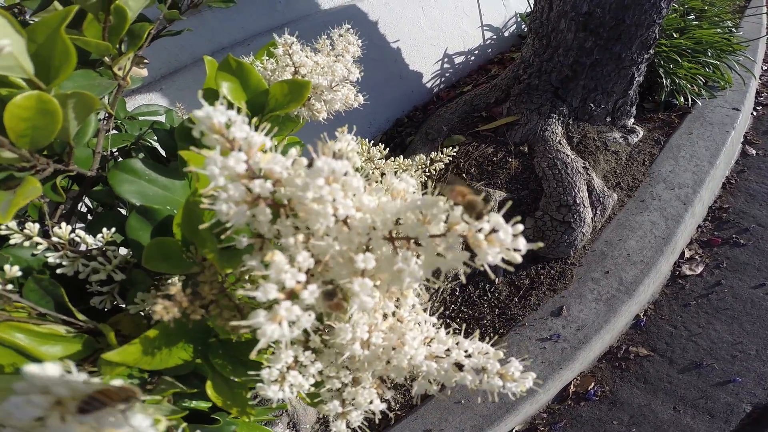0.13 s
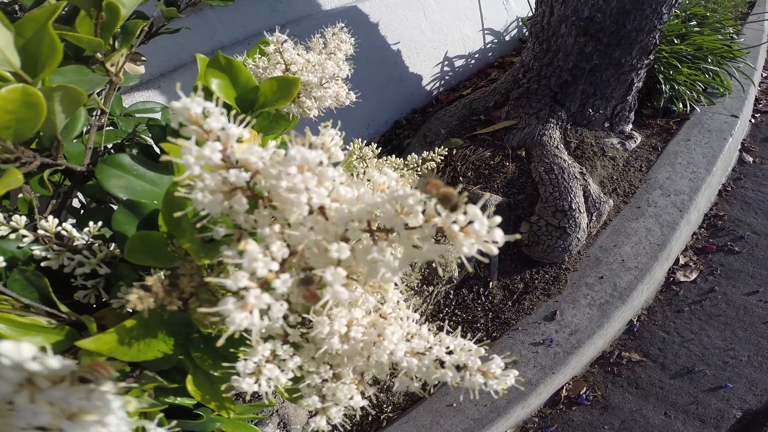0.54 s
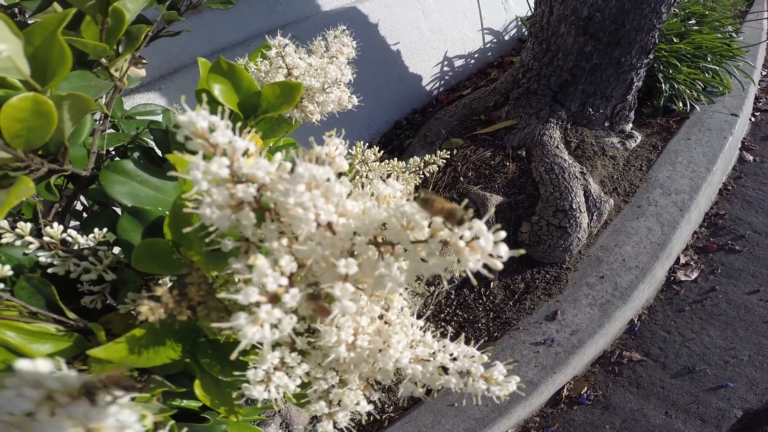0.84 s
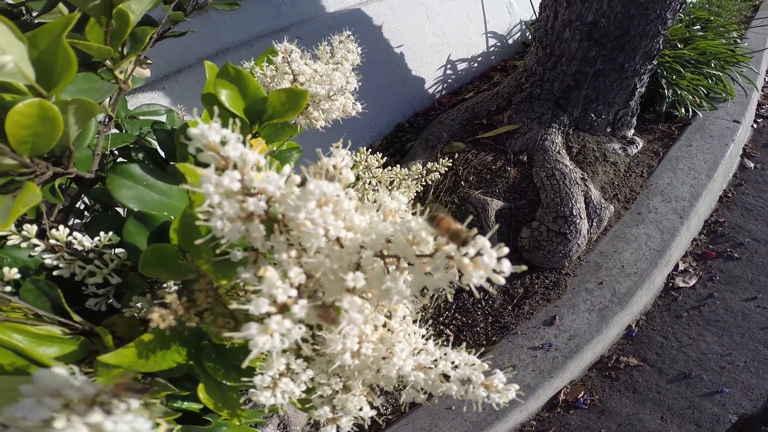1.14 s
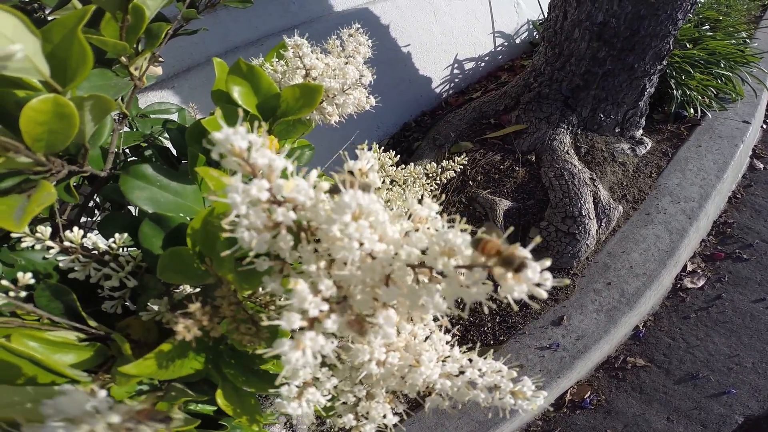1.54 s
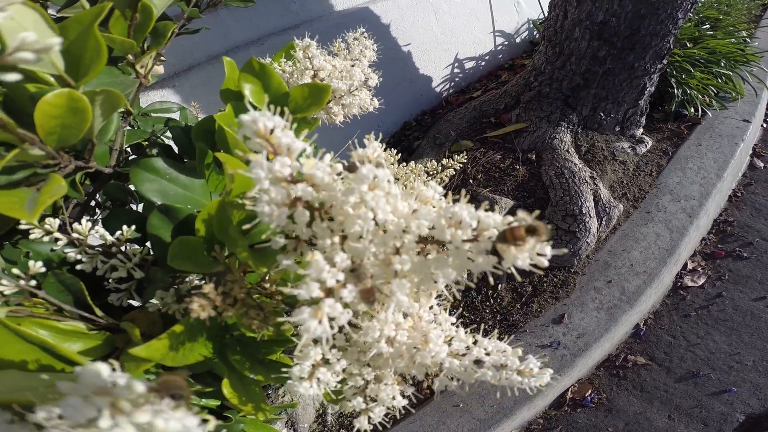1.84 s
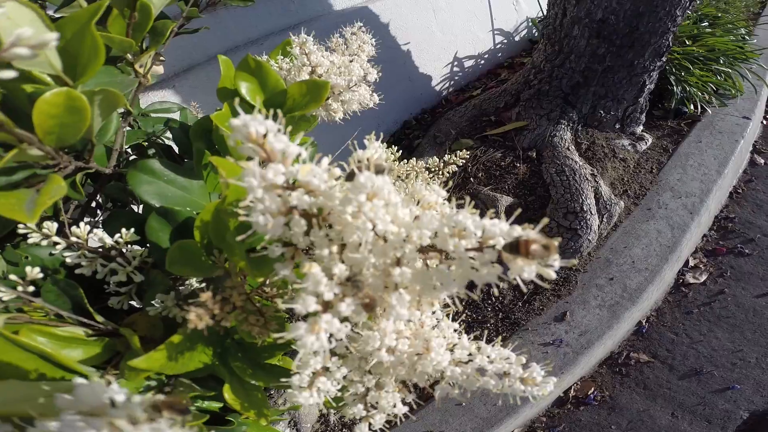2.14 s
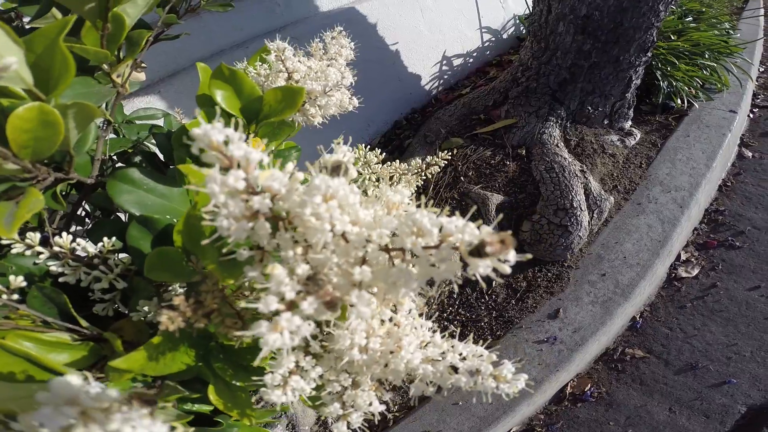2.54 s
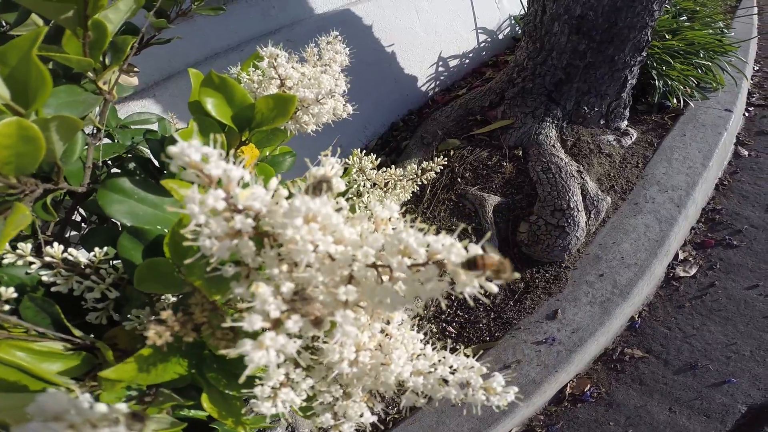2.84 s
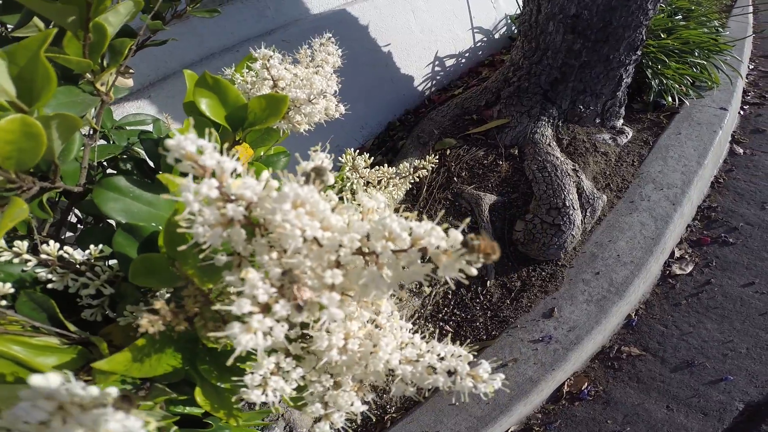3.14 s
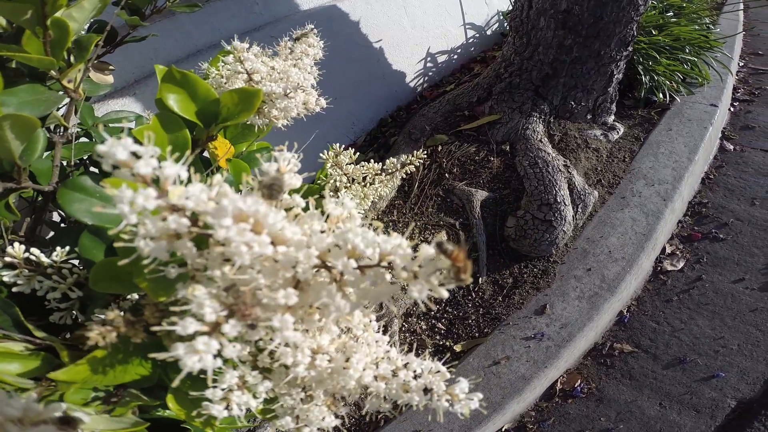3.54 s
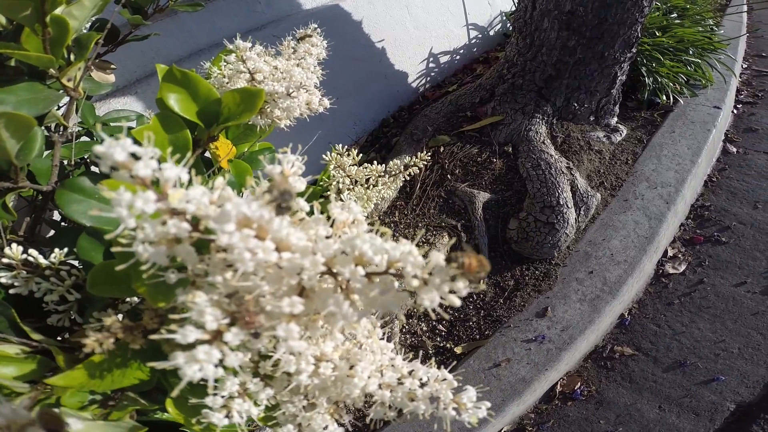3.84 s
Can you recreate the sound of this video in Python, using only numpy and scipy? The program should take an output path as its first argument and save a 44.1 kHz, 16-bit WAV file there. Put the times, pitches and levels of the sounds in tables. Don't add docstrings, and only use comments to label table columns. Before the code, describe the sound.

Outdoors, low wind buffeting strikes the microphone in irregular bursts and fades late, uncovering soft distant town noise, thin sliding bird notes, light leaf crackles and a very brief second bee hum.

```python
import sys
import numpy as np
from scipy import signal
from scipy.io import wavfile
from scipy.ndimage import uniform_filter1d

SR = 44100
rng = np.random.default_rng(int(sys.argv[2]) if len(sys.argv) > 2 else 0)


def store_pcm(level_fs):
    pcm = np.round(np.clip(level_fs, -1, 1) * 32767).astype(np.int16)
    wavfile.write(sys.argv[1], SR, np.atleast_2d(pcm).T)


def voltage_ratio(decibels):
    exponent = np.asarray(decibels, float) / 20
    return 10 ** exponent


N = 176400


def lowpass_or_band(x, edge_hz, kind):
    return signal.sosfilt(signal.butter(2, edge_hz, kind, fs=SR, output="sos"), x)


def drift(rate_hz):
    pole = np.exp(-80 * np.pi * rate_hz / SR)
    slow = signal.lfilter([1], [1, -2 * pole, pole * pole], rng.standard_normal(N // 40 + 2002))[2000:]
    return np.interp(np.arange(N) / 40, np.arange(len(slow)), slow / slow.std())


# [t/s, level/dB, eddy width/ms]
GUSTS = [(0, -29, 3), (.1, -23.5, 2.8), (0.226, -23, 1.3), (0.259, -33.5, 2.1), (.48, -25, 3.2),
         (.72, -33, 4), (1.0, -37.5, 3.8), (1.119, -30.5, 2.8), (1.42, -24.5, 1.1), (1.66, -25, 2.55),
         (2.12, -29, 2.2), (2.56, -32, 2.9), (2.9, -39.5, 5.14), (3.33, -28.5, 2.4), (3.45, -60, 1.6),
         (3.6, -36.5, 6.8), (3.7, -55.5, 4.3), (4.0, -48.5, 2.7)]
# [t/s, width/s, depth/dB]
LULLS = [
    (0.427, 0.02, 15),
    (0.562, 0.047, 10),
    (1.02, 0.034, 8.5),
    (1.722, 0.022, 21),
    (2.304, 0.0065, 26),
    (2.36, 0.019, 13),
    (2.86, 0.034, 14),
    (3.14, 0.012, 1.5),
]


def gust_db(t):
    s, db, _ = np.transpose(GUSTS)
    dips = sum(depth_db * np.exp(-((t - at) / width) ** 2 / 2) for at, width, depth_db in LULLS)
    return np.interp(t, s, db) - dips


def add_eddy(out, s, db, width_ms, sign):
    suction, lag, wider = .62, 1.3 * 2.355, 1.5
    w = width_ms * SR / 2355
    i = np.arange(max(int(s * SR - 5 * w), 0), min(int(s * SR + 16 * w), len(out)))
    u = (i - s * SR) / w
    push = np.exp(-u ** 2 / 2)
    pull = suction * np.exp(-((u - lag) / wider) ** 2 / 2)
    out[i] += sign * voltage_ratio(db) * (push - pull)


# [t/s, peak level/dB,
# width/ms]
EDDIES = [(0.009, -12.5, 1.58), (0.042, -16, 1.55), (0.142, -14.5, 4.4), (0.176, -13, 3.2),
          (0.224, -5, 1.89), (0.321, -16.5, 2.07), (0.474, -20.5, 1.9), (0.763, -24, 3.6),
          (1.229, -12, 2.27), (1.267, -13, 3.15), (1.317, -17, 1.4), (1.37, -11, 1.28), (1.413, -9, 1.94),
          (1.452, -15, 1.75), (1.49, -14.5, 1.15), (1.526, -17.5, 1.37), (1.56, -10, 1.82),
          (1.599, -17.5, 1.27), (1.631, -20, 1.23), (1.836, -15.5, 3), (1.917, -11, 1.61),
          (2.213, -17.5, 3), (2.247, -22.5, 1.46), (2.328, -13.5, 1.9), (2.436, -17, 2.6), (2.675, -18, 3),
          (3.195, -26, 1.9), (3.329, -21.5, 3.1), (3.988, -25.5, 5),
          (0.058, -16.5, 2.1), (0.128, -24.5, 1.6), (0.16, -13.5, 1.7), (0.193, -15, 1.2),
         (0.336, -20, 2.96), (0.461, -19, 2.74), (0.741, -24, 1.8), (0.828, -25, 3.8), (1.213, -19, 1.9),
         (1.3248, -24, 0.79), (1.342, -20, 1.5), (1.386, -19, 1.52), (1.43, -15.5, 1.54),
         (1.471, -16.5, 1.13), (1.579, -20, 2.4), (1.614, -18, 1.54), (1.675, -26, 2.8), (1.819, -21, 1.9),
         (1.899, -25, 2), (1.941, -25, 1.1), (1.966, -21.5, 1.8), (1.998, -27, 1.3), (2.032, -28, 2.1),
         (2.154, -20, 2.3), (2.447, -24, 9.5), (2.489, -25, 2.3), (2.527, -23, 2.5), (2.992, -29, 2.7),
         (3.113, -24, 4.2), (3.276, -27, 2.7), (3.341, -23, 1.94),
          (0.05, -18, 2.45), (0.148, -18.7, 1.3), (0.2, -15.9, 13.5), (0.234, -20.5, 1.2),
           (0.479, -25, 1.67), (0.487, -25, 1.77), (0.492, -25, 5.1), (0.662, -25, 2.8),
           (0.679, -28.5, 2.7), (0.694, -26, 4.9), (0.703, -26, 2.04), (0.717, -26, 6.2), (0.728, -26, 3.7),
           (0.803, -27, 2.3), (1.115, -25, 8), (1.128, -17.5, 3.8), (1.138, -23.5, 3), (1.258, -22, 6.1),
           (1.308, -22.3, 1.45), (1.324, -20, 1.8), (1.354, -18, 1.9), (1.361, -12, 1.36),
           (1.377, -19, 1.5), (1.391, -18.5, 1.2), (1.406, -19.5, 1.1), (1.436, -24, 2.4),
           (1.441, -13, 1.34), (1.51, -21.6, 2.5), (1.566, -20, 4.6), (1.594, -20, 1.34), (1.623, -19, 1.4),
           (1.641, -21, 4.1), (1.799, -31, 3.7), (1.809, -23.5, 1.8), (1.855, -27.5, 5.7),
           (1.891, -22.5, 1.9), (1.926, -18.5, 1.66), (2.007, -22, 2), (2.018, -20, 1.8), (2.051, -22, 2.6),
           (2.054, -21, 1.31), (2.069, -26, 2.2), (2.087, -28, 2.4), (2.104, -22.5, 1.9), (2.167, -33, 7.8),
           (2.194, -19, 2.1), (2.259, -20.5, 1.8), (2.376, -24.5, 2.6), (2.536, -20, 3.4),
           (2.559, -23.5, 3.0), (2.563, -28, 3), (2.583, -21, 2.4), (2.756, -22, 2.6), (2.979, -28.3, 5.7),
           (3.171, -23.5, 8), (3.24, -28, 4.8), (3.248, -24, 2.5), (3.291, -31, 4.4), (3.336, -32, 2.5),
           (3.347, -30, 2.9)]
# [t/s, peak level/dB, width/ms]
TWIN = (.2275, -14, 1.5)
# [t/s, peak level/dB, width/ms]
PULLS = [(0.071, -16.5, 3.2), (0.128, -12, 1.7), (.134, -16, 1.8), (.136, -17, 1.08), (.184, -17, 1.3),
         (.187, -14.5, 2.3), (0.21, -16, 6.3), (.935, -23.5, 4.5), (1.072, -21.5, 5.9), (1.572, -18, 2.5),
         (1.589, -18.5, 1.53), (1.681, -24, 3.6), (2.706, -22, 4.4), (2.803, -24.5, 5.7),
         (3.423, -33.5, 9.1)]


def wind():
    lead_s, eddy_count = .25, 460
    out = np.zeros(N + SR // 2)
    s, _, ms = np.transpose(GUSTS)
    pushes = EDDIES + [TWIN]
    for k, (late, size, wide, push) in enumerate(rng.random((eddy_count, 4))):
        t = (k + 2 * late) * (N / SR) / eddy_count
        level_db = gust_db(t) + 2.5 - 5.5 * (np.log(size + .06) + 1)
        nearest_s = min(abs(t - row[0]) for row in pushes + PULLS)
        level_db -= 12 * np.exp(-(nearest_s / .012) ** 2)
        width_ms = np.clip(np.interp(t, s, ms), .8, 8) * np.exp(.26 * (wide - .5) * 3.5)
        add_eddy(out, t + lead_s, level_db, width_ms, 1 if push < .7 else -1)
    for t, peak_db, width_ms in pushes:
        add_eddy(out, t + lead_s, peak_db, width_ms, 1)
    for t, peak_db, width_ms in PULLS:
        add_eddy(out, t + lead_s, peak_db, width_ms, -1)
    add_eddy(out, lead_s, -15, 3.0, -1)

    strength_db = gust_db(np.arange(len(out)) / SR - lead_s)
    swell = lowpass_or_band(rng.standard_normal(len(out)), 62.6, "low")
    out += swell / swell.std() * voltage_ratio(-8.5 + strength_db)
    churn = lowpass_or_band(np.diff(swell, prepend=0), [137, 404], "band")
    out += churn / churn.std() * voltage_ratio(-39 + 1.79 * (strength_db + 23.5))
    out = lowpass_or_band(out, 25, "high")
    return out[int(lead_s * SR):][:N]


# [f/Hz, level/dB per Hz]
AIR = [(24, -21), (40, -3.5), (132, -1.5), (196, -7), (347, -15.5), (529, -17), (614, -18), (3240, -28),
       (15100, -47)]


def air():
    level_db, waver_db = -51.5, 0.87
    out, together = 0, drift(2.5)
    edges = 32 * 2 ** np.arange(0, 9.1, .5)
    white = rng.standard_normal((2, N))
    hz, db = np.transpose(AIR)
    for k, (low, high) in enumerate(zip(edges, edges[1:])):
        band = lowpass_or_band(white[k % 2], [low, high], "band")
        band_db = np.interp(np.log(low * high) / 2, np.log(hz), db)
        out = out + band * voltage_ratio(band_db + waver_db * (0.61 * together + drift(3.8)))
    return voltage_ratio(level_db) * out / out.std()


# [f/Hz, rms level/dB]
WHINE = [(8781, -97), (11688, -97), (11719, -96), (14626, -99)]


def whine():
    t = np.arange(N) / SR
    return sum(2 ** .5 * voltage_ratio(db) * np.sin(2 * np.pi * hz * t) for hz, db in WHINE)


# [t/s, wingbeat f/Hz, buzz level/dB, brightest multiple of the wingbeat, hum level/dB]
BEE_NEAR = [(.49, 222, -85, 5, -85), (.53, 221, -63, 5.1, -72), (.615, 214, -69, 4.7, -68),
            (.67, 221, -62, 4.9, -68), (.72, 213, -64, 4.9, -59), (.78, 218, -59.5, 4.35, -51),
            (.82, 221, -66, 4.2, -54), (.855, 229, -60, 4, -55), (.9, 216, -70, 4, -60),
            (1.0, 233, -74, 4, -61), (1.12, 224, -74, 4, -63), (1.2, 226, -88, 4, -75)]
# [t/s, wingbeat f/Hz, buzz level/dB, brightest multiple of the wingbeat, hum level/dB]
BEE_FAR = [
    (3.8, 221, -86.5, 3.5, -84),
    (3.84, 221.3, -61.5, 3.2, -59),
    (3.91, 222, -66, 3.4, -61.5),
    (3.97, 225, -94, 3.4, -94),
]


def bee(path):
    s, *columns = np.transpose(path)
    t = np.arange(N) / SR
    hz, buzz_db, bright, hum_db = [np.interp(t, s, c) for c in columns]
    jitter, swim_db = .005, 1.2
    phase = 2 * np.pi * np.cumsum(hz * (1 + jitter * drift(24.2))) / SR
    tone = voltage_ratio(hum_db) * (voltage_ratio(-4) * np.sin(phase) + voltage_ratio(swim_db * drift(6.7)) * np.sin(2 * phase))
    for k in range(3, 10):
        share = voltage_ratio(-14 * (k - bright) ** 2) + voltage_ratio(-13)
        tone += voltage_ratio(buzz_db + swim_db * drift(9)) * share * np.sin(k * phase)
    return tone * ((t > s[0]) & (t < s[-1]))


# [t/s, length/s, level/dB, brightness f/Hz]
RUSTLES = [
    (0.553, 0.29, -68.5, 3900),
    (1.818, 0.027, -76, 12000),
    (2.333, 0.146, -67, 5640),
    (2.806, 0.053, -67, 5830),
    (2.904, .05, -74, 9100),
    (3.028, 0.22, -72, 7500),
    (3.842, 0.047, -69.5, 6000),
    (3.909, 0.061, -64.5, 5840),
]
TICK_HZ = [4450, 4860, 5350]


def leaves():
    crackles_per_s, spread_db = 800, 1.8
    grains = voltage_ratio(spread_db * np.minimum(rng.exponential(1, N), 5)) * rng.choice([-1, 1], N)
    grains = grains * (rng.random(N) < crackles_per_s / SR)
    out, t = np.zeros(N), np.arange(N) / SR
    for s, length, db, hz in RUSTLES:
        x = signal.lfilter(*signal.iirpeak(hz, 1, fs=SR), grains + 1e-18)
        arch = np.sin(np.pi * np.clip((t - s) / length, 0, 1))
        out += voltage_ratio(db) * x / x.std() * np.sqrt(np.clip(arch, 0, 1))
    tick_s, tick_db, fall_60db_s = .605, -53, .01
    since = np.maximum(t - tick_s, 0)
    ring = voltage_ratio(tick_db - 60 * since / fall_60db_s)
    return out + sum(ring * np.sin(2 * np.pi * hz * since) for hz in TICK_HZ)


# [t/s, length/s, start f/Hz, end f/Hz, level/dB]
NOTES = [(2.02, .045, 4050, 4400, -77), (2.17, .075, 3980, 4150, -77), (2.37, .07, 4050, 3900, -76),
         (2.93, .05, 4050, 3250, -73), (3.07, .035, 3950, 3100, -75), (3.22, .04, 4500, 4200, -73.5),
         (3.255, .072, 3900, 3120, -68.5), (3.385, .03, 2800, 2650, -70), (3.505, .025, 2700, 2780, -70),
         (3.66, .042, 3800, 3100, -68), (3.738, .03, 3350, 3300, -72), (3.77, .03, 3250, 3120, -69),
         (3.97, .035, 2500, 2800, -67)]


def bird():
    edge_s, swell_db, bend = .008, 6, .75
    out = np.zeros(N + SR)
    for s, length, start_hz, end_hz, db in NOTES:
        t = np.arange(int(length * SR)) / SR
        edge = np.clip(np.minimum(t, length - t) / edge_s, 0, 1)
        hz = start_hz * (end_hz / start_hz) ** (t / length) ** bend
        note = np.sin(2 * np.pi * np.cumsum(hz) / SR)
        out[int(s * SR):][:len(t)] += voltage_ratio(db + 6.5 - swell_db * (1.0 - t / length)) * edge * note
    lag = int(.015 * SR)
    out[lag:] += voltage_ratio(-9) * out[:-lag]
    return out[:N] * voltage_ratio(3.0 * drift(45))


def scene():
    return (wind() + air() + bee(BEE_NEAR) + bee(BEE_FAR) + bird() + leaves())[None]


def lose_treble(x):
    top_hz, cut_hz, frame = 12900, 15000, 1024
    lead = np.r_[x[frame:0:-1], x]
    top = signal.sosfiltfilt(signal.ellip(8, .3, 40, top_hz, "high", fs=SR, output="sos"), lead)
    cells = signal.stft(top, nperseg=2 * frame)[2]
    bins, frames = cells.shape
    luck = uniform_filter1d(rng.random(frames), size=2)
    rank = np.argsort(np.argsort(luck)) / frames
    frame_off = rank < np.linspace(.5, .08, frames)
    patch_off = np.repeat(rng.random((bins, frames)) < .42, 6, axis=0)[:bins]
    lost = (frame_off | patch_off) & (np.arange(frames) > 2)
    x = lead - signal.istft(cells * lost, nperseg=2 * frame)[1][:len(lead)]
    return signal.sosfilt(signal.ellip(8, .3, 45, cut_hz, fs=SR, output="sos"), x)[frame:]


def band_limit(x):
    return signal.sosfilt(signal.butter(12, 15240, fs=SR, output="sos"), x)


def record(dry):
    limit = .38
    x = limit * np.tanh(dry[0] / limit) + whine()
    mix = lose_treble(x)[None]
    return band_limit(mix)


dry = scene()
out = record(dry)
store_pcm(out)
```